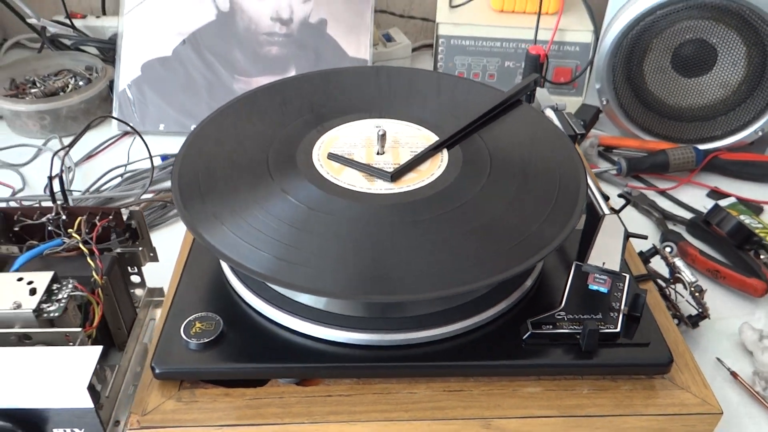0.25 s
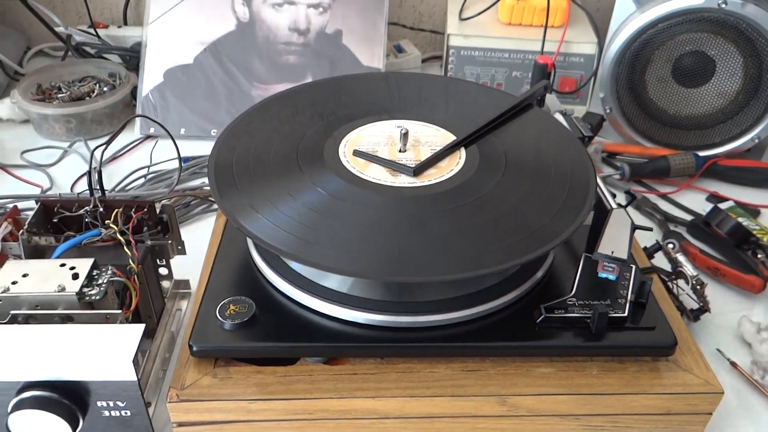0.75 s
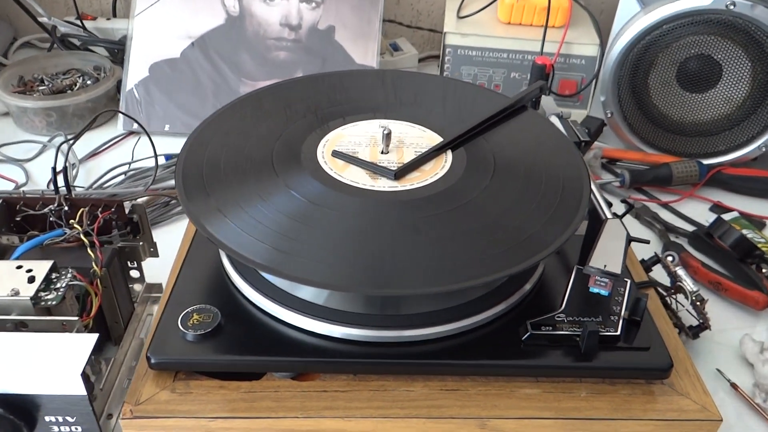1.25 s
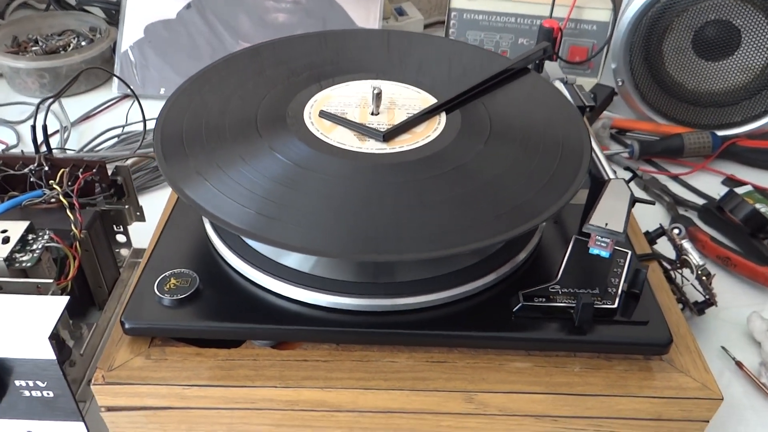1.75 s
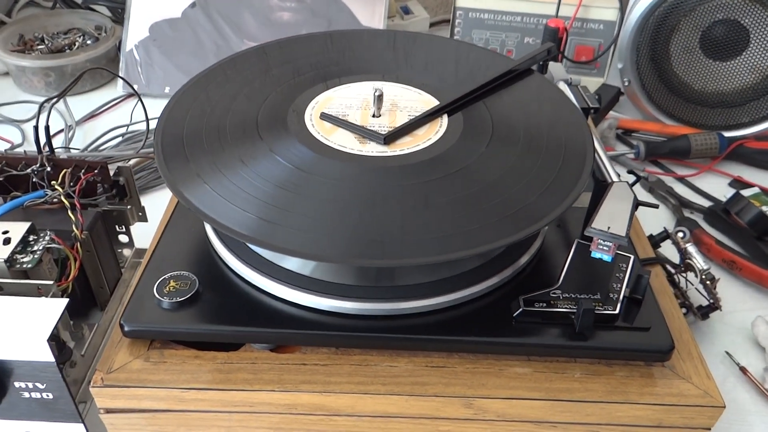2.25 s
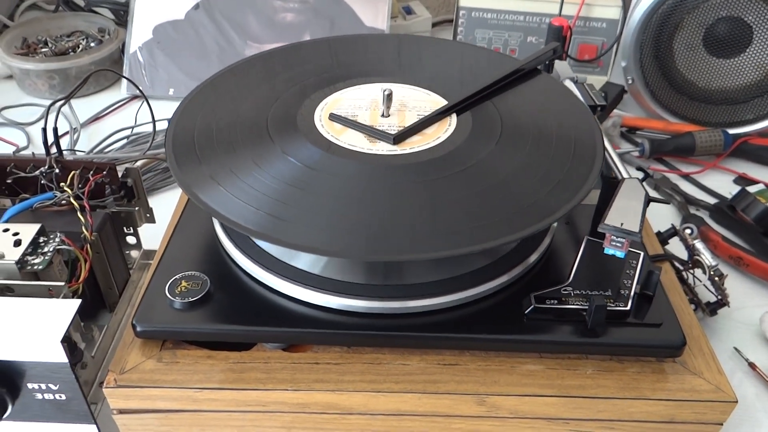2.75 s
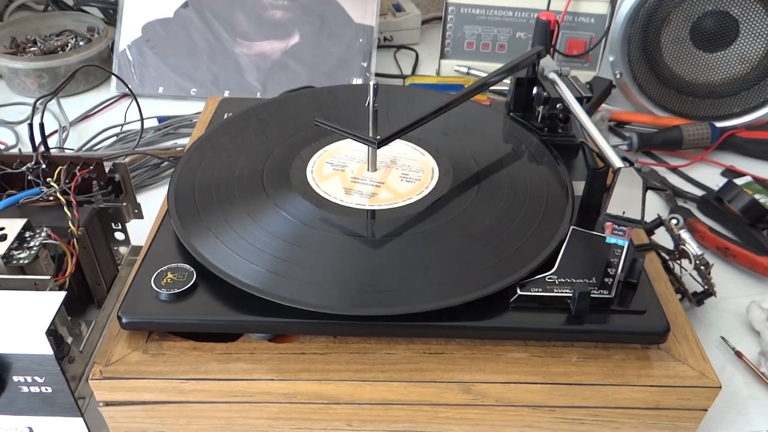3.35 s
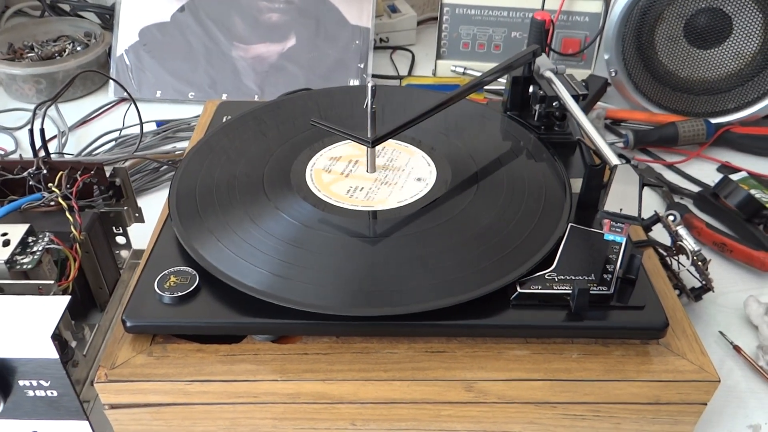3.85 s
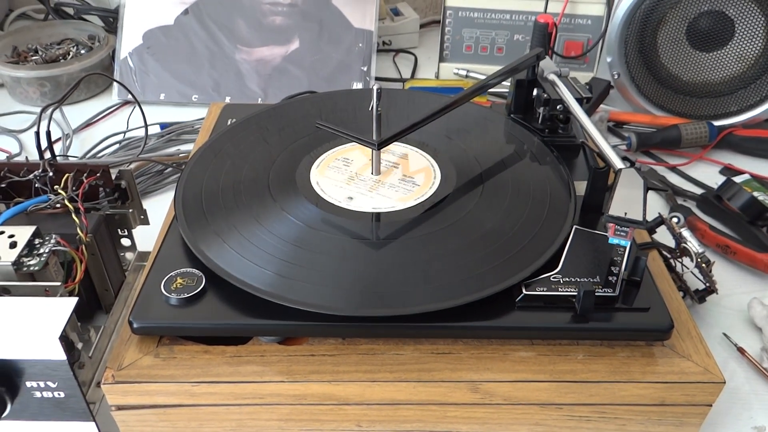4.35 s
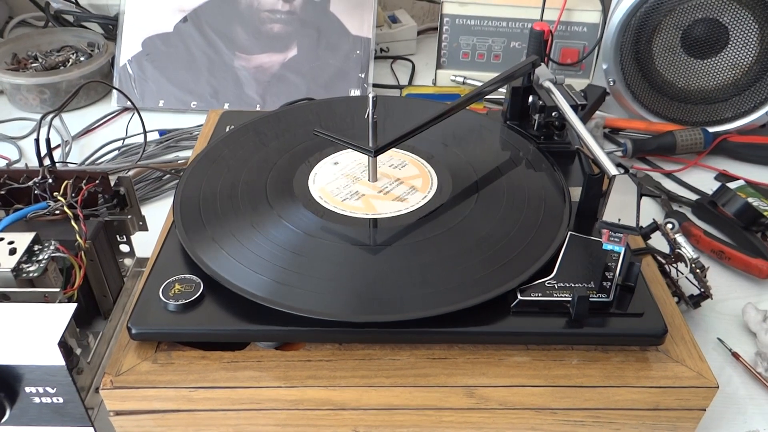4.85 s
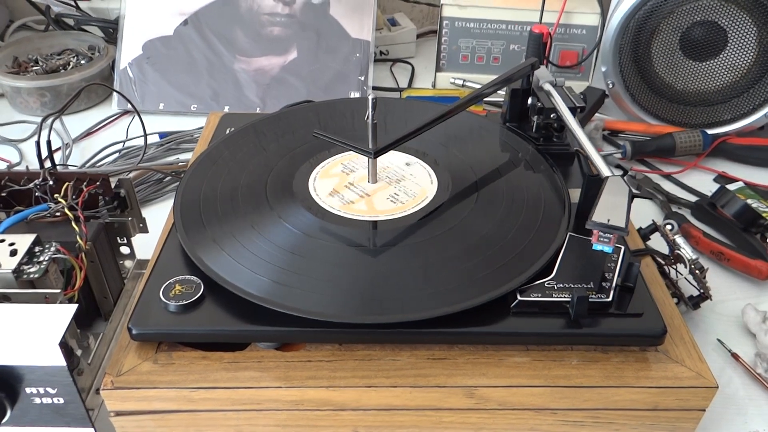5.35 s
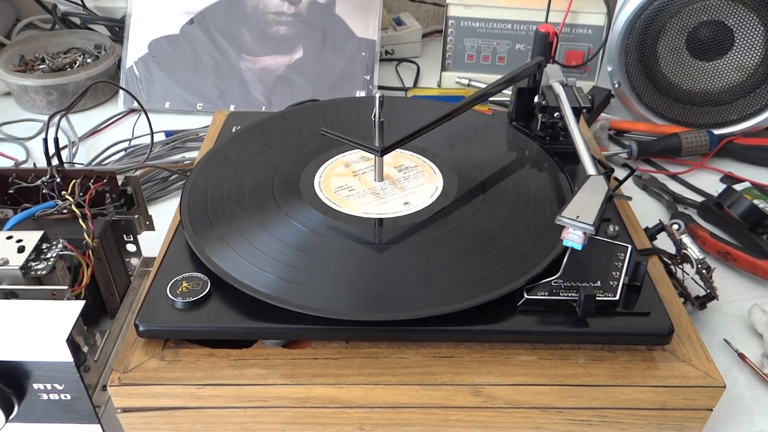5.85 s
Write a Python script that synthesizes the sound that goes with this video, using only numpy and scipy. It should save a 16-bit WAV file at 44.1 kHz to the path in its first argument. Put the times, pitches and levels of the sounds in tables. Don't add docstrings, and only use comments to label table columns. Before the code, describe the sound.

A close, stereo hand-held pickup of a record changer in a small workshop, with faint mains hum and soft hiss throughout. At about 0.27 seconds a thin metal switch snaps brightly with a rebound, and at 0.37 a lever clicks hard into place. Around 0.55 the linkage rubs faintly and the motor hum grows slightly. A weaker lever return clicks at 0.68, with tiny rebounds; dull bumps and faint rubs continue to about 1.1. Quiet follows until 2.34, when the spindle releases in a fast, hard, woody-metallic rattle, ending in small rocking knocks by 2.56. At 3.10 the disc scrapes down, slaps at 3.15 and bounces heavily at 3.22, the loudest moment, settling by 3.3. A crisp double cam click sounds at 3.92, a softer trip click at 4.27. Only hum, hiss and tiny ticks near 5.5 and 6.0 remain.

```python
import sys
import numpy as np
from scipy import signal
from scipy.fft import rfft, irfft, next_fast_len
from scipy.io import wavfile
from scipy.ndimage import map_coordinates

SR = 44100
rng = np.random.default_rng(int(sys.argv[2]) if len(sys.argv) > 2 else 0)


def invert_db(level):
    return 10 ** (np.asarray(level, dtype=float) / 20)


def unload_wav(signal):
    wavfile.write(
        sys.argv[1],
        SR,
        np.round(np.clip(np.atleast_2d(signal).T, -1, 1) * 32767).astype(np.int16),
    )


N = 269010


def changer():
    deck = switch() + lever() + lever_return() + release() + spindle() + rock()
    deck += slide() + slap() + settle() + cam() + trip() + ticks()
    return filtered(deck, lambda hz: (1j * hz / (110 + 1j * hz)) ** 2)


# start in seconds, weight (ringing) level in dB, click (hard edge) level in dB.
SWITCH_CONTACTS = [
    (.2695, -53, -102),
    (.2755, -37.5, -37),
    (.2781, -43, -26),
    (.2982, -48, -31),
    (.3033, -47, -32),
]
# frequency in Hz, width in Hz, level in dB.
SWITCH_MODES = [(280, 31, -15.5), (736, 26, -12.5), (2920, 86, -8), (3540, 44, -13), (4120, 49, -5.5),
                (5900, 30, -14.5), (5790, 140, -9), (7000, 50, -17), (8880, 40, -5), (9500, 65, -11),
                (10350, 70, -13), (11400, 42, -13), (12400, 50, -16), (13600, 38, -28)]
# frequency in Hz, spectral density in dB per Hz.
SWITCH_BLOW = [(88, -67), (150, -14), (589, -15), (730, -8), (2450, -6), (2870, -11), (7620, -4),
               (9080, 5.5), (12700, -9), (16000, -32)]


def switch():
    return part(SWITCH_CONTACTS, SWITCH_MODES, SWITCH_BLOW, damping=2.35,
                shudder_t60=0.096, shudder_db=-3.5, tilt_db=-1.4, room_db=-5.5)


# start in seconds, weight level in dB, click level in dB.
LEVER_CONTACTS = [
    (.3640, -38, -29),
    (.3660, -37.5, -31),
    (.3725, -38, -27),
]
# frequency in Hz, width in Hz, level in dB.
LEVER_MODES = [(285, 32, -9), (736, 33, -16), (1530, 41, -15), (1950, 24, -10), (2020, 42, -19),
               (2345, 40, -7), (2810, 140, -9), (3300, 100, -5), (4180, 65, -17), (5400, 78, -26),
               (5500, 67, -17), (7100, 50, -36), (8850, 85, -10.5), (9000, 23, -32)]
# frequency in Hz, spectral density in dB per Hz.
LEVER_BLOW = [(88, -73), (150, -44), (286, 8), (589, -45), (702, 2), (960, -5.5), (1830, 2), (4860, -21.5),
              (9080, -21.5), (16000, -44)]


def lever():
    return part(LEVER_CONTACTS, LEVER_MODES, LEVER_BLOW, damping=2.9,
                shudder_t60=0.042, shudder_db=4.5, tilt_db=-1.0, room_db=-6.0)


# start in seconds, weight level in dB, click level in dB.
RETURN_CONTACTS = [
    (.6750, -41, -42.5),
    (.6789, -49, -54),
    (.6880, -53.5, -44),
    (.7125, -52, -53),
    (.7165, -50, -56),
    (.7255, -53, -61),
    (.7700, -61, -65),
]
# frequency in Hz, width in Hz, level in dB.
RETURN_MODES = [(825, 29, -17), (1606, 31, -8), (1900, 51, -1), (2070, 33, -19), (2300, 28, -7),
                (2540, 13, -28), (2880, 79, -4.5), (3140, 71, -11), (3970, 170, -4), (4120, 72, -13),
                (5740, 110, -15)]


def lever_return():
    return part(RETURN_CONTACTS, RETURN_MODES, LEVER_BLOW, damping=3.5,
                shudder_t60=0.08, shudder_db=1, tilt_db=0.5, room_db=-7.0)


# start in seconds, weight level in dB, click level in dB,
# extra brightness of the click in dB per octave.
RELEASE_CONTACTS = [
    (2.3392, -49.5, -52, -4),
    (2.3432, -23, -19.5, -4),
]
# frequency in Hz, width in Hz, level in dB.
RELEASE_MODES = [(293, 13.6, -14), (721, 20, -7.5), (826, 39, -9), (1770, 69, -7), (2950, 220, -12.5)]
# frequency in Hz, spectral density in dB per Hz.
SPINDLE_BLOW = [(60, -66), (180, -32), (290, 0), (500, 2), (720, 0), (1200, 3), (1850, 4), (4000, -4),
                (9300, -13), (11500, -27.5), (16000, -35), (16800, -42.5)]


def release():
    return part(RELEASE_CONTACTS, RELEASE_MODES, SPINDLE_BLOW, damping=1.94,
                shudder_t60=0.025, shudder_db=-8, tilt_db=-0.5, room_db=-6)


# start in seconds, weight level in dB, click level in dB,
# extra brightness of the click in dB per octave.
SPINDLE_CONTACTS = [(2.3455, -41, -23, 5.5), (2.3544, -25, -21, 2), (2.3622, -37.5, -25.5, 2.5),
                    (2.3657, -25, -12.5, 1.5), (2.3728, -26, -20.5, 6.5), (2.3760, -25, -25.5, 2),
                    (2.3801, -34.5, -21.5, 3), (2.3840, -49, -26.5, 2), (2.3895, -41, -26.5, 0.5),
                    (2.3970, -28, -25.5, 4), (2.4066, -35, -15, -5.5), (2.4144, -26.5, -15, -3),
                    (2.4174, -31, -23, 1), (2.4226, -35, -21.5, -1), (2.4297, -42, -29, -0.5),
                    (2.4380, -41, -31.5, -2.5)]
# frequency in Hz, width in Hz, level in dB.
SPINDLE_MODES = [(303, 7.3, -13), (715, 30, -3.5), (834, 36, -5), (952, 33, -10), (1288, 33, -15.5),
                 (1473, 120, -7), (1830, 190, -7), (2010, 62, -19), (2560, 31, -20), (3420, 340, -24)]


def spindle():
    return part(SPINDLE_CONTACTS, SPINDLE_MODES, SPINDLE_BLOW, damping=2.8,
                shudder_t60=0.035, shudder_db=-1.0, tilt_db=1.5, room_db=-8.0)


# start in seconds, weight level in dB, click level in dB.
ROCK_CONTACTS = [
    (2.4676, -40, -53),
    (2.4844, -33.5, -31.5),
    (2.492, -34, -49),
    (2.525, -47.5, -52),
    (2.545, -71, -58),
    (2.559, -49.5, -65),
]
# frequency in Hz, width in Hz, level in dB.
ROCK_MODES = [(286, 40, -22), (722, 18, -2.5), (821, 19, -4.5), (1920, 71, -25)]


def rock():
    return part(ROCK_CONTACTS, ROCK_MODES, SPINDLE_BLOW, damping=4.9,
                shudder_t60=0.019, shudder_db=-22, tilt_db=-2.5, room_db=-18.5)


# start in seconds, weight level in dB, click level in dB,
# extra brightness of the click in dB per octave.
SLIDE_CONTACTS = [
    (3.1021, -55.5, -52, -2),
    (3.1086, -43.5, -57, -11),
    (3.1149, -47.5, -34, 0),
    (3.1175, -32, -27.5, 5.5),
    (3.1198, -35, -22, 2),
    (3.1270, -36.5, -23, 5),
    (3.1341, -34.5, -29, -5.5),
    (3.1420, -34, -31, -1.5),
    (3.1457, -41, -28, 4.5),
    (3.1478, -36.5, -26, -2),
]
# frequency in Hz, width in Hz, level in dB.
SLIDE_MODES = [(310, 30, -16.5), (829, 26, -6), (1730, 67, -4.5), (4230, 51, -13.5), (6020, 65.4, -13),
               (6336, 28.2, -22), (7440, 42, -11.5), (8640, 115, -9)]
# frequency in Hz, spectral density in dB per Hz.
SLIDE_BLOW = [(88, -47), (150, -20.5), (299, -14), (549, -16), (830, 1), (4970, -15), (8970, -15.5),
              (15000, -41.5), (16500, -59.5)]


def slide():
    return part(SLIDE_CONTACTS, SLIDE_MODES, SLIDE_BLOW, damping=3.6,
                shudder_t60=0.044, shudder_db=3, tilt_db=-1.2, room_db=-2.0)


# start in seconds, weight level in dB, click level in dB,
# extra brightness of the click in dB per octave.
SLAP_CONTACTS = [
    (3.1517, -22, -9, -2),
    (3.1552, -32.5, -16, 3),
    (3.1576, -30.5, -20, 4),
    (3.1610, -23, -25, -1),
    (3.1633, -32.5, -20, 2.5),
    (3.1695, -30.5, -22.5, -0.5),
    (3.1750, -32, -21.5, 1),
    (3.1845, -33.5, -25, 0),
    (3.1965, -43.5, -29.5, 3),
    (3.2020, -36.5, -30.5, -5),
]
# frequency in Hz, width in Hz, level in dB.
SLAP_MODES = [(340, 54.5, -15.5), (704, 22, -3), (841, 52, -3), (1415, 51, -19.5), (1860, 140, -5.5),
              (2094, 47, -3), (2770, 33, -7), (3070, 90.7, -10.5), (3720, 36.3, -28.5), (4357, 47, -20),
              (4800, 58.4, -13.5), (5840, 16.96, -17.5)]
# frequency in Hz, spectral density in dB per Hz.
SLAP_BLOW = [(47, -56), (80, -27.5), (134, -22.5), (436, -15), (850, -4.5), (1420, -13), (2030, -12.5),
             (9660, -19.5), (15100, -41.5), (16500, -73.5)]


def slap():
    return part(SLAP_CONTACTS, SLAP_MODES, SLAP_BLOW, damping=4.55,
                shudder_t60=.06, shudder_db=2.5, tilt_db=-3.5, room_db=-8.0)


# start in seconds, weight level in dB, click level in dB,
# extra brightness of the click in dB per octave.
SETTLE_CONTACTS = [(3.2138, -21, -19, 0.5), (3.2155, -24.5, -13, 0), (3.2176, -32.5, -15.5, 5),
                   (3.2222, -18.5, -12, 0.5), (3.2264, -23, -14.5, -4), (3.2357, -27, -17.5, 1),
                   (3.2415, -27, -17.5, 3), (3.2433, -29, -18, -0.5), (3.2462, -33, -18, 2.5),
                   (3.2505, -29.5, -24, -0.5), (3.2553, -30, -20.5, 1), (3.2586, -35.5, -21, -3.5),
                   (3.2655, -36.5, -28.5, -0.5), (3.2698, -37, -26.5, -2), (3.2790, -39, -31.5, -1.5),
                   (3.2821, -37.5, -25, 0), (3.2955, -40.5, -34, -1.5), (3.42, -49.5, -51, 3)]
# frequency in Hz, width in Hz, level in dB.
SETTLE_MODES = [(590, 65, -6.5), (919, 40, -10.5), (1335, 97, -7.5), (1898, 110, 2), (2332, 30.7, -6),
                (2486, 112, -6.5), (2823, 59, -17), (2980, 60, -18), (3180, 38, -23.5), (3060, 40, -22.5),
                (5550, 185, -27)]
# frequency in Hz, spectral density in dB per Hz.
SETTLE_BLOW = [(90, -58), (250, -28), (600, -10.5), (800, -10.5), (1900, -1.5), (3500, -7.5), (5500, -15.5),
               (9500, -14.5), (11500, -26), (15500, -35.5), (16800, -45.5)]


def settle():
    return part(SETTLE_CONTACTS, SETTLE_MODES, SETTLE_BLOW, damping=4.4,
                shudder_t60=0.039, shudder_db=1.1, tilt_db=-2.0, room_db=-8.5)


# start in seconds, weight level in dB, click level in dB,
# extra brightness of the click in dB per octave.
CAM_CONTACTS = [
    (3.9200, -33, -29.5, 1.5),
    (3.9222, -34.5, -22, -0.5),
    (3.9255, -41.5, -31, -6),
    (3.9290, -48, -26.5, 0.5),
    (3.9345, -37, -26, -0.5),
    (3.9370, -43, -25.5, -4.5),
]
# frequency in Hz, width in Hz, level in dB.
CAM_MODES = [(283, 19, -17), (875, 200, -6.5), (1267, 48, -5), (1520, 51, -11.5), (1823, 63, -10.5),
             (2046, 50, -6.5), (2440, 46, -21), (2762, 73, -6.5), (3070, 45, -18), (3780, 52, -15),
             (3910, 75, -7.5), (5314, 87, -18.5), (7070, 60, -14.5), (8820, 48, -17)]
# frequency in Hz, spectral density in dB per Hz.
CAM_BLOW = [(150, -35), (290, -2), (500, -25), (1000, -16), (1250, -3), (2800, 4.5), (4100, -3.5),
            (4500, -19), (7200, -14), (9200, -22.5), (10200, -27.5), (14500, -39), (16000, -49.5)]


def cam():
    return part(CAM_CONTACTS, CAM_MODES, CAM_BLOW, damping=2.4,
                shudder_t60=0.041, shudder_db=3.5, tilt_db=0.0, room_db=-5.0)


# start in seconds, weight level in dB, click level in dB,
# extra brightness of the click in dB per octave.
TRIP_CONTACTS = [
    (4.2700, -42, -36.5, -1),
    (4.2745, -50, -54, 5),
    (4.2806, -44, -42, -1.5),
    (4.2840, -47, -61, 4),
    (4.3005, -52, -51, 1.5),
]
# frequency in Hz, width in Hz, level in dB.
TRIP_MODES = [(301, 22, -11), (850, 90, -9.5), (1200, 40, -9), (1290, 56, -5), (1355, 49, -12),
              (1555, 35, -12), (1715, 40, -4), (2745, 34, -13), (2990, 34, -17), (3410, 60, -17),
              (4730, 65, -22.5)]
# frequency in Hz, spectral density in dB per Hz.
TRIP_BLOW = [(150, -32), (400, -19), (900, -3), (1500, 3.5), (3200, -10), (4000, -21), (8000, -26),
             (16000, -52)]


def trip():
    return part(TRIP_CONTACTS, TRIP_MODES, TRIP_BLOW, damping=4.8,
                shudder_t60=0.038, shudder_db=-4.0, tilt_db=-0.1, room_db=-6.0)


# start in seconds, weight level in dB, click level in dB.
TICK_CONTACTS = [
    (.148, -67.5, -75),
    (1.015, -68, -55.5),
    (1.1265, -59.5, -62),
    (2.3065, -60, -55),
    (5.525, -87, -62),
    (5.9845, -64, -55),
    (5.993, -76, -72),
]
# frequency in Hz, spectral density in dB per Hz.
TICK_BLOW = [(200, -42), (600, -5), (1000, -2), (2900, 9.5), (3600, -31), (16000, -54)]


def ticks():
    return part(TICK_CONTACTS, TRIP_MODES, TICK_BLOW, damping=2.7,
                shudder_t60=0.053, shudder_db=8.5, tilt_db=-7.5, room_db=-10)


def part(contacts, modes, colour, damping, shudder_t60, shudder_db, tilt_db, room_db):
    hard_tilt = 0.22
    chatter_s, chatter_db = 0.00083, -11
    scatter_db, pair_spread = 2.5, .4
    out = np.zeros(N + SR)
    t = np.arange(SR // 5, dtype=np.float32) / SR
    hz, width, level_db = np.repeat(modes, 2, axis=0).T[:, :, None]
    decay = np.exp(np.float32(-damping * width) * t)
    for s, weight_db, click_db, *brighter_db in contacts:
        treble_db = tilt_db + hard_tilt * (click_db - weight_db)
        edge_db = treble_db + sum(brighter_db)

        mode_db = level_db + rng.normal(0, scatter_db, hz.shape) + .5 * edge_db * np.log2(hz / 2000)
        strength = invert_db(mode_db) * np.sqrt(width / 40)
        detune = pair_spread * width * rng.standard_normal(hz.shape)
        modes_ringing = strength * decay * np.sin(np.float32(2 * np.pi * (hz + detune)) * t)
        ring = modes_ringing.sum(0) * (1 - np.exp(-t / 0.0017))

        noise = signal.fftconvolve(rng.standard_normal(len(t)), click(colour, treble_db))[:len(t)]
        shudder = unit(noise) * invert_db(-60 * t / shudder_t60) * (1 - np.exp(-t / 0.0012))

        chatter = invert_db(chatter_db) * rng.standard_normal(256) * np.exp(-t[:256] / chatter_s)
        chatter[0] = 1
        edge = np.convolve(click(colour, edge_db), chatter)

        blow = invert_db(weight_db) * (ring + invert_db(shudder_db) * shudder)
        blow[:len(edge)] -= invert_db(click_db) * edge
        out[round(s * SR):][:len(t)] += blow
    direct = out[:N]
    return direct + diffuse(invert_db(room_db) * shop(direct)[:, :N], ECHO_ALIKE)


def click(colour, treble_db):
    hz = np.fft.rfftfreq(1024, 1 / SR)
    level_db = along(colour, hz) + treble_db * np.log2(np.clip(hz, 300, 12000) / 2000)
    cepstrum = irfft(np.log(invert_db(level_db) + 1e-6))
    cepstrum[1:512] *= 2
    cepstrum[513:] = 0
    pulse = irfft(np.exp(rfft(cepstrum)))[:512]
    return pulse / np.abs(pulse).max()


# frequency in Hz, likeness from 0 to 1.
ECHO_ALIKE = [(200, 1), (900, 0.87), (3000, 0.88), (9500, 0.86), (10800, 0.78), (11800, 0.99)]
# frequency in Hz, 60 dB decay time in seconds.
SHOP_T60 = [(120, 0.26), (330, 0.3), (600, .36), (2000, 0.36), (4000, 0.39), (9000, .3), (12500, 0.15)]


def shop(x):
    hz, t, z = signal.stft(rng.standard_normal((2, 2 * SR // 5)), SR, nperseg=256)
    decay = invert_db(-60 * t / along(SHOP_T60, hz)[:, None])
    tail = signal.istft(z * decay, SR, nperseg=256)[1]
    delayed = np.pad(x, (220, 0))[None]
    return signal.fftconvolve(delayed, tail / np.linalg.norm(tail[0]), axes=1)


# start in seconds, hold in seconds, level in dB, bright share from 0 to 1.
RUB_STROKES = [
    (0, 0.0089, -66, 0.02),
    (0.53, 0.063, -61.5, .12),
    (0.606, .04, -70, 0.8),
    (0.86, 0.043, -67.5, 0.7),
    (1, .02, -68.5, 0.44),
]
# frequency in Hz, spectral density in dB per Hz.
RUB_COLOURS = [
    [(500, -35), (1200, 0.5), (3000, 2), (6000, -4), (11000, -17), (16000, -38.5)],
    [(1500, -21), (5000, -8), (8500, -2), (10500, -9), (12500, -22.5), (16000, -40.5)],
]


def linkage():
    rise, fall = 230, 126
    s, hold, level_db, bright = np.transpose(RUB_STROKES)[:, :, None]
    t = np.arange(N) / SR - s
    stroke_db = level_db - rise * np.maximum(-t, 0) - fall * np.maximum(t - hold, 0)
    power = invert_db(stroke_db) ** 2
    dull_rub, bright_rub = [coloured_noise(colour, ECHO_ALIKE) for colour in RUB_COLOURS]
    dull_level = np.sqrt((power * (1 - bright)).sum(0))
    bright_level = np.sqrt((power * bright).sum(0))
    return invert_db(1.2 * wobble(60.5)) * (dull_level * dull_rub + bright_level * bright_rub)


# start in seconds, peak level in dB, frequency in Hz.
THUMPS = [(.575, -58, 136), (.60, -65, 62), (.63, -68, 103), (.845, -52.5, 170), (.86, -61, 60),
          (0.929, -55, 130), (.95, -68, 55), (2.353, -47, 158.5), (2.381, -50, 153), (3.158, -37.5, 144),
          (1.003, -50, 150), (1.018, -48, 120)]


def handling():
    out = np.zeros(N + SR)
    t = np.arange(SR // 5) / SR
    u = t / 0.011
    for s, db, hz in THUMPS:
        out[round(s * SR):][:len(t)] += invert_db(db + 4.5) * u * np.exp(-u) * np.sin(2 * np.pi * hz * t)
    return out[:N]


# multiple of the mains frequency, level
# in dB.
MAINS = [(2, 0), (3, -10), (4, -14), (6, -10), (8, -18), (11.2, -17), (18, -16)]


def mains_hum():
    motor_on_s, motor_rise_s, before_db = 0.57, 0.071, -6.5
    t = np.arange(N) / SR
    motor_off = np.clip(1 - (t - motor_on_s) / motor_rise_s, 0, 1)
    turn = 2 * np.pi * 49.95 * t
    hum = sum(invert_db(db + 2.0 + 0.038 * k * wobble(3.2)) * np.sin(k * turn + k * k) for k, db in MAINS)
    return invert_db(-65 + before_db * motor_off) * hum


# frequency in Hz, spectral density in dB per Hz.
HISS = [(20, -35.5), (43, -26), (63, -13.5), (80, -14.5), (125, -13.5), (240, -11), (500, -10), (900, -9.5),
        (1100, -12), (2440, -20), (8650, -26), (11000, -29), (15200, -33), (16500, -46.5)]
# frequency in Hz, likeness from 0 to 1.
HISS_ALIKE = [(60, 0.74), (150, 1), (400, 0.601), (800, 0.22), (1600, 0.5), (3100, 0.32), (6200, 0.81),
              (14000, 0.97)]


def room_hiss():
    return invert_db(-64 + 0.46 * wobble(11)) * coloured_noise(HISS, HISS_ALIKE)


def coloured_noise(colour, alike):
    noise = filtered(rng.standard_normal((2, N)), lambda hz: invert_db(along(colour, hz)))
    return unit(diffuse(noise, alike))


def diffuse(pair, alike):
    def mix(hz):
        turn = np.arccos(np.clip(along(alike, hz), -1, 1)) / 2
        return np.array([np.cos(turn), np.sin(turn)])
    mid, side = filtered(pair, mix)
    return np.array([mid + side, mid - side])


def filtered(x, response):
    n = x.shape[-1]
    m = next_fast_len(n + 8192)
    return irfft(rfft(x, m) * response(np.fft.rfftfreq(m, 1 / SR)), m)[..., :n]


def wobble(rate):
    knots = rng.standard_normal(int(N * rate / SR) + 4)
    return map_coordinates(knots, [np.arange(N) * rate / SR])


def along(points, hz):
    f, v = np.transpose(points)
    return np.interp(np.log(hz + 1), np.log(f + 1), v)


def unit(x):
    return x / np.sqrt(np.mean(x ** 2) + 1e-20)


def scene():
    return changer() + linkage() + handling() + mains_hum() + room_hiss()


def roll_off(x):
    return signal.sosfilt(signal.butter(12, 16800, fs=SR, output="sos"), x)


# frequency in Hz, lead of left over right in radians.
LEAD = [(60, 0), (200, -.48), (400, -.57), (800, -.86), (1600, -.69), (3100, -.45), (6200, -.19),
        (11500, 0)]


def record(dry):
    def band_response(hz):
        phase = np.exp(.5j * np.outer([1, -1], along(LEAD, hz)))
        return phase * invert_db(-17 * (hz > 15950))
    heard = filtered(dry, band_response)
    return roll_off(heard)


dry = scene()
out = record(dry)
unload_wav(out)
```